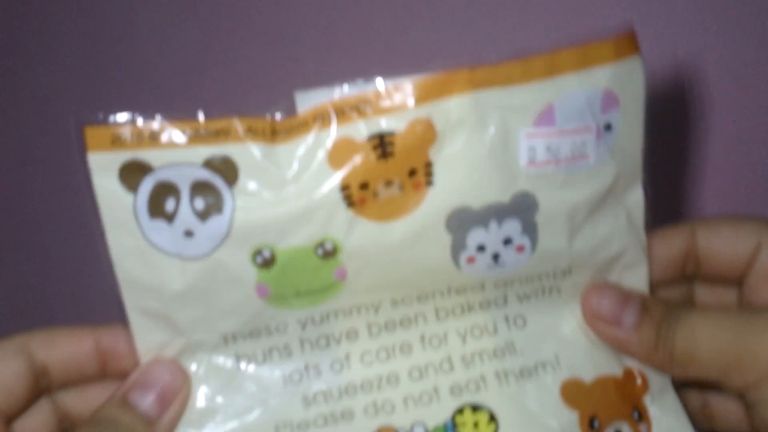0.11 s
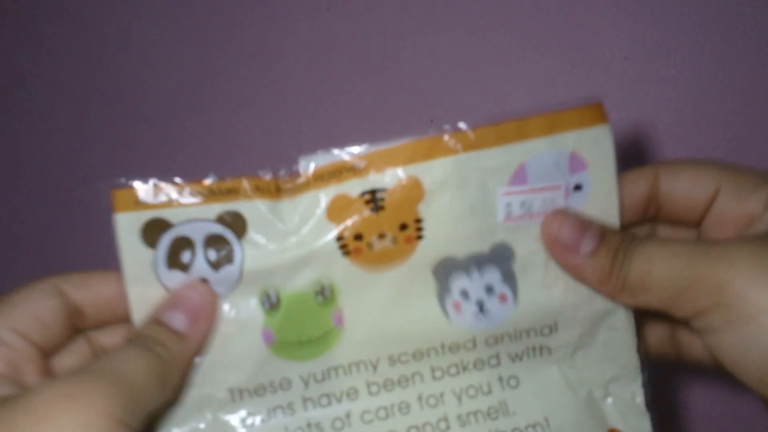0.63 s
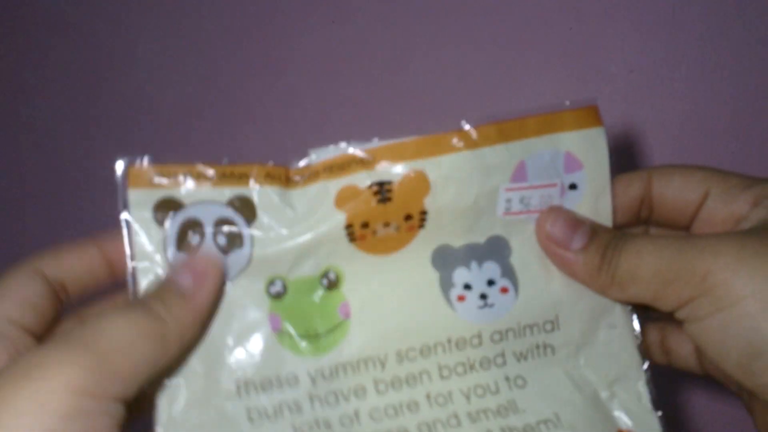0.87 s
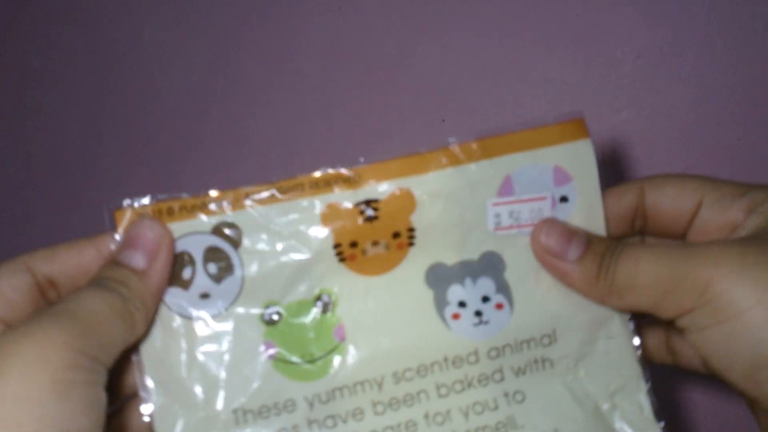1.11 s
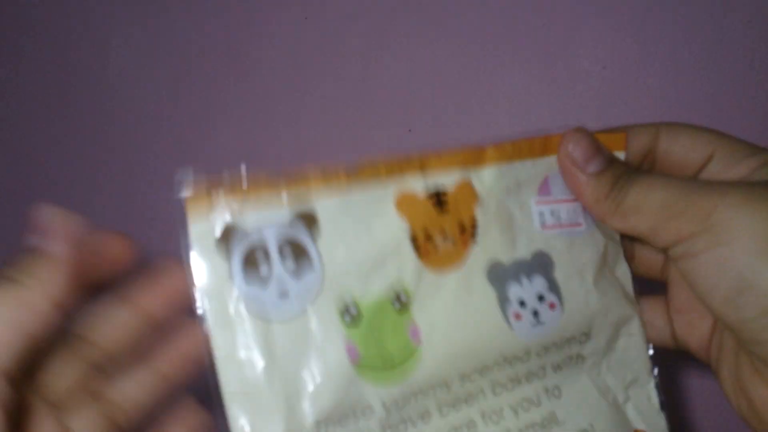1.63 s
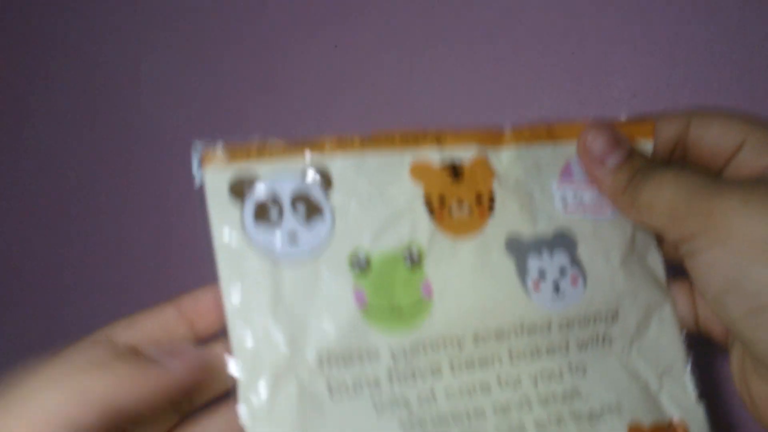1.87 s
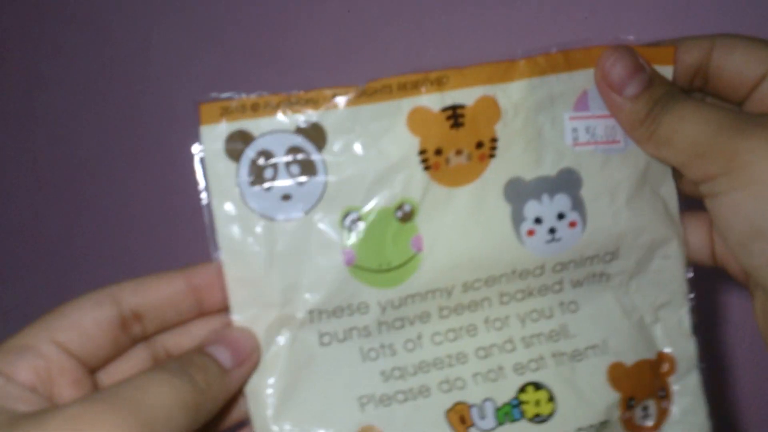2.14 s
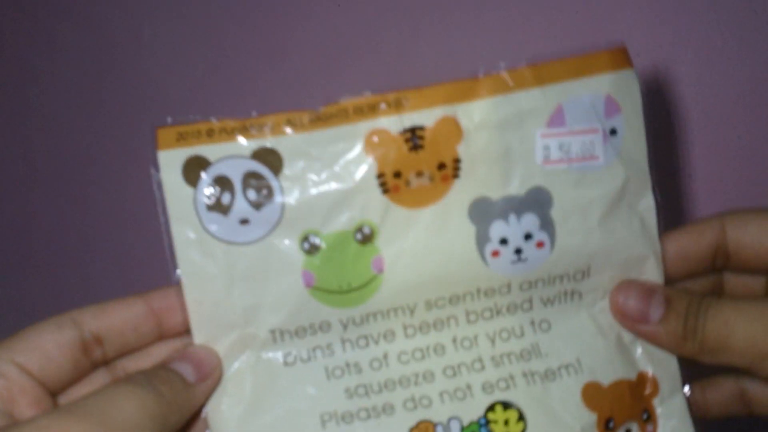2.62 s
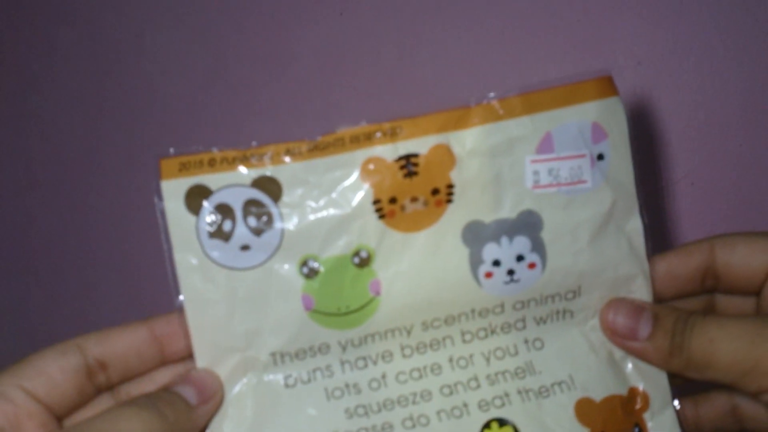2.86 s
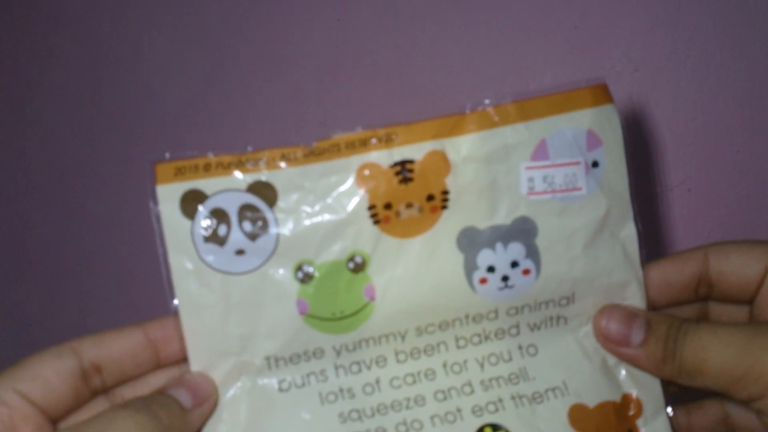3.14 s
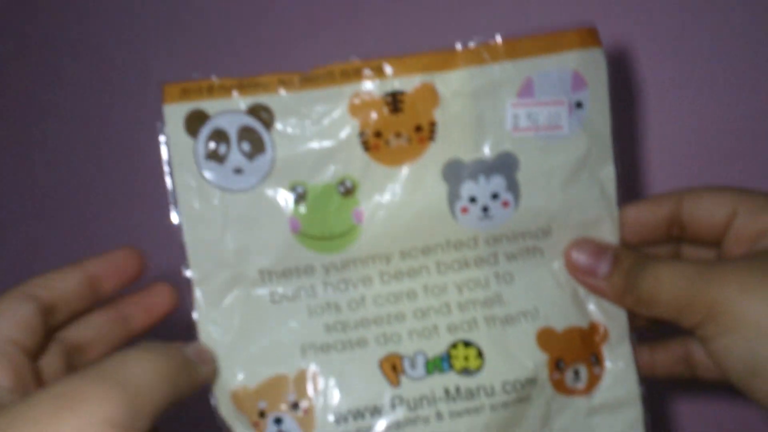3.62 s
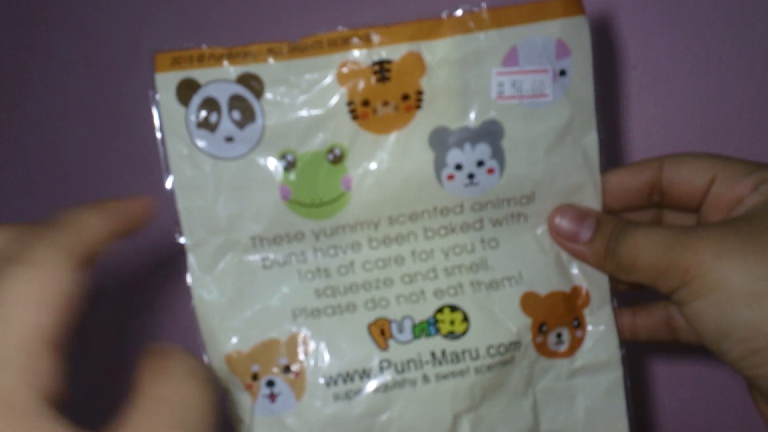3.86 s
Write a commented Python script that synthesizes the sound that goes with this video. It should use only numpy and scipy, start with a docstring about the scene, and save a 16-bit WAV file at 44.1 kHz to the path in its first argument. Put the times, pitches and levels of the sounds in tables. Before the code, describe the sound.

A thin plastic packet crackles close to stereo microphones in a quiet small room. The loudest, densest burst comes within the first 0.15 seconds; uneven crisp snaps and soft low air puffs continue, strong again around 0.55 and 0.75, thinning after 1.7. A lighter cluster returns at 2.2-2.45, then scattered ticks, faint ones near 3.35 and 3.55. Low motor hum, hiss and a barely audible airy band persist to 4 seconds.

```python
"""A thin plastic packet crackles and snaps close to a pair of microphones in a quiet room, squeezed by hands.
Creases buckle in bursts of clicks, each striking a bank of decaying resonances: the film and the air it holds.
Soft low pulses are the air the packet pumps; two noise tails give the reflections.
A motor hums low as wavering sines, over shaped noise for the room and the microphone hiss.
A faint airy band of noise, carried on a gliding tone, rises a little and then slides mostly down."""
import sys
import numpy as np
from scipy import signal
from scipy.fft import rfft, irfft
from scipy.io import wavfile

SR = 44100
rng = np.random.default_rng(int(sys.argv[2]) if len(sys.argv) > 2 else 0)


def int16_out(signal):
    """Quantize to a 16-bit WAV file."""
    q = np.round(np.clip(np.atleast_2d(signal).T, -1, 1) * 32767)
    wavfile.write(sys.argv[1], SR, q.astype(np.int16))


def to_linear_factor(level_db):
    """Convert decibel levels (scalar or array-like) to linear amplitude factors."""
    exponent = np.asarray(level_db, float) / 20
    return 10 ** exponent


N = 176400  # four seconds
T = np.arange(N) / SR


def rms_one(x):
    """Scale to rms 1."""
    return x / np.sqrt(np.mean(x ** 2) + 1e-20)


def at_hz(points, hz):
    """Read a (frequency, value) table on a log-frequency axis."""
    table_hz, values = np.transpose(points)
    return np.interp(np.log(hz), np.log(table_hz), values)


def drift(rate_hz):
    """Random wander of rms 1: white noise through two equal one-pole low-passes at rate_hz."""
    r = np.exp(-2 * np.pi * rate_hz / SR)
    noise = rng.standard_normal(N + SR)
    return rms_one(signal.lfilter([1], [1, -2 * r, r * r], noise)[SR:])  # drop the filter's settling


def crackle():
    """Fingers press the film: clicks at random moments, in clumps, follow the pressure."""
    # finger pressure, heard as crackle: (time [s], level [dB], treble tilt [dB])
    squeeze = [(0.0, -46.5, -4), (0.034, -49.5, 2), (0.041, -37.5, -1.5), (0.094, -32.5, -2),
               (0.095, -25.5, -4), (0.132, -27, -6.5), (.139, -33.5, -0.5), (0.188, -54, -1),
               (0.258, -59, -3.5), (.265, -46.5, -2), (0.37, -52.5, -3.5), (0.389, -67, 2), (.5, -78, -24),
               (0.542, -42, -4.5), (0.574, -45.5, -9), (.6, -61.5, 7), (.63, -67.5, 2), (0.708, -83, -9),
               (0.718, -40.5, -9), (0.762, -41, -1.5), (0.786, -36, -3), (0.808, -59.5, 8), (.86, -71, -3),
               (.94, -49, -7), (1.021, -53, 1), (1.04, -85, 16), (1.073, -75, 1), (1.082, -48, -5.5),
               (1.122, -41.5, 3.5), (1.132, -54, 3.5), (1.21, -57.5, 2.5), (1.25, -64, 8),
               (1.29, -55, -5.5), (1.332, -49.5, 0.5), (1.39, -76.5, -1), (1.45, -49.5, -13),
               (1.5, -63, -4.5), (1.522, -52, 1.5), (1.604, -73.5, 0), (1.62, -47, -3.5), (1.656, -67, 5),
               (1.689, -65, 0), (1.75, -70.5, -9)]
    hold_db, hold_treble_db, hold_until_s = -73, -6, 2.72  # faint crackle while the packet is only held
    clicks_per_s = 5000  # before clumping
    level_db, spread_db = -11, 1.5
    s, squeeze_db, squeeze_treble_db = np.transpose(squeeze)

    clumps_db = 2.8 * drift(90)
    born = rng.random(N) < clicks_per_s * to_linear_factor(clumps_db) / SR
    uneven_db = spread_db * np.minimum(rng.exponential(1, N), 3)
    sizes = rms_one(born * to_linear_factor(clumps_db + uneven_db))
    pressure_db = np.interp(T, s, squeeze_db, right=hold_db)
    sizes = sizes * to_linear_factor(pressure_db + level_db) * (T < hold_until_s)

    treble = np.interp(T, s, squeeze_treble_db, right=hold_treble_db) + 2 * drift(90)
    bass = np.full(N, -11.5)  # dB
    pitch = 1100 * 2 ** (0.49 * drift(47))  # Hz, wandering by octaves
    return sizes, treble, bass, pitch


def add_snaps(sizes, treble, bass, pitch):
    """A single crease buckles: twenty quick clicks rise, fade and grow duller, replacing crackle they land on."""
    # creases: (time [s], level [dB], treble tilt [dB], bass tilt [dB], pitch [Hz])
    snaps = [(0.003, -30.5, -5.5, -13, 990), (0.02, -39, -5, -13, 1000), (0.025, -26.5, -9, -12, 980),
             (0.036, -36, 6.5, -20, 3300), (0.049, -39, -14, -20, 1100), (0.062, -24.5, -8, -19, 1400.0),
             (0.07, -34, -5, -26, 990.0), (0.085, -32.5, 8, -6, 990.0), (0.097, -22, -19, -23, 1010),
             (0.102, -21, -17, -20, 1300), (0.122, -18, -19, -9, 1010.0), (0.126, -40, -7.0, -11, 940.0),
             (0.134, -12.5, -19, -16, 970), (0.167, -46, 4, -7, 1380.0), (0.202, -38, -11, -12, 1400.0),
             (0.22, -40.5, 0, -12, 1030.0), (0.235, -39, 2.5, -12, 1370.0), (0.261, -34, -21, -18, 1470),
             (0.268, -31.5, -2, -39, 1340), (0.281, -38, 3, -18, 1220.0), (0.294, -41, -12, -15, 1370.0),
             (0.309, -28.5, -4, -36, 1400), (0.331, -36.5, 1, -8, 835), (0.346, -31.5, -3, -20, 1530.0),
             (0.359, -34, -9, -8, 1640), (0.368, -37.5, -9, -4, 1200), (0.403, -45, 2, 6, 1470),
             (0.465, -45.5, -13, -10, 1030), (0.513, -39.5, -13.5, -12, 1400), (0.529, -40, -5, 8, 1430.0),
             (0.546, -28.5, -6, -6, 1170), (0.562, -27.5, -2.5, -12, 900), (0.568, -36.5, 0, -16, 1300),
             (0.591, -35, 3.5, -16, 1420), (0.61, -47, -7, -13, 760.0), (0.661, -44.5, -6.5, -24, 3750),
             (0.719, -36.5, -4, -10, 1000), (0.726, -30, -4.5, -16, 870.0), (0.738, -35, 3, -31, 1570.0),
             (0.758, -30, -2, -4, 1400), (0.762, -24, -0.5, -16, 1300), (0.781, -25.5, -12, -12, 1340),
             (0.803, -46, -5, -16, 930.0), (0.836, -50, -3, -17, 1440.0), (0.853, -38.5, -5, -18, 3470),
             (0.874, -29.5, -9, -32, 1400), (0.896, -41.5, 3.5, -21, 1320), (0.912, -40, -8.0, -16, 1400),
             (0.924, -45.5, 4, -20, 1590.0), (0.937, -37, -20, -19, 980.0), (0.949, -40, 8.5, 4, 1460.0),
             (0.962, -49, 10, -17, 4500), (0.975, -41.5, 3, 0, 1510.0), (0.982, -33, -2, -4, 820),
             (1.004, -34, -16, -20, 1490), (1.022, -47, 7, -2, 1400.0), (1.087, -37.5, -14, -10, 1260),
             (1.095, -41, 5, -10, 710.0), (1.103, -45, -8, -24, 1370), (1.112, -38.5, 8, 0, 4870),
             (1.121, -37, 7, -10, 1490), (1.139, -32.5, -8, -25, 1290), (1.152, -33, 0, -26, 1430),
             (1.173, -32.5, -14, -37, 1400.0), (1.179, -28.5, -1.5, -29, 1430),
             (1.192, -42, -7, -10, 1040.0), (1.205, -33.5, 6, -17, 1400), (1.21, -28.5, 5, -17, 1400.0),
             (1.223, -35, -20, -9, 1410.0), (1.231, -39, -3, -8, 1010.0), (1.243, -50, -27, -14, 1130.0),
             (1.271, -34, -12.5, -34, 1440), (1.293, -32.5, -7, -10, 614), (1.311, -35, -4, -10, 760),
             (1.332, -31.5, -0.5, -19, 810), (1.34, -43, -3, -17, 780.0), (1.364, -48.5, -3, 7, 940),
             (1.447, -39.5, -3.5, -21, 1480.0), (1.455, -37, -7.5, -16, 900), (1.474, -48, -6, -7.0, 1400),
             (1.487, -38.5, 0.5, -12, 1200), (1.516, -42, 8, -14, 1000), (1.52, -31.5, 3, -10, 1200),
             (1.529, -32, -20, -10, 1370), (1.538, -47, -17, 3, 920.0), (1.552, -48, 4, -2, 600),
             (1.565, -40.5, -33, -17, 1570.0), (1.577, -50, -12, -14, 750.0), (1.587, -50, -16, 5, 1065),
             (1.615, -43.5, 0.5, -15, 2480), (1.634, -39.5, 5.5, -4, 810.0), (1.652, -42, 6, 1, 850.0),
             (1.664, -39.5, -20, -22, 1500.0), (1.682, -55, -6.0, 7, 1470), (1.726, -51.5, -4, -3, 1390),
             (1.744, -50, 7.5, -1, 520.0), (1.83, -53, -18, 8, 920.0), (1.862, -41.5, -12, -21, 820),
             (1.924, -54, -17, 8, 1770), (2.091, -51.5, -5, 8.5, 930.0), (2.142, -40, -11.5, -5, 950.0),
             (2.18, -48, -16, -13, 1590), (2.195, -36, -15, -6, 990), (2.203, -38.5, -7.5, -24, 855),
             (2.215, -52, -13.0, -17, 1350.0), (2.271, -55.5, 5, -10, 980.0),
             (2.285, -35.5, -11, -22, 1060.0), (2.295, -50, -14, -11, 1650.0), (2.312, -48, -3, -13, 960.0),
             (2.339, -29.5, -6.5, -39, 1570), (2.363, -39, -7.5, -25, 1400), (2.375, -48, -5, 1, 1490),
             (2.386, -39.5, -10, -29, 1650.0), (2.412, -34, -4.5, -32, 1400.0),
             (2.421, -37, -4, -34, 1340.0), (2.429, -43, -5, -35, 1420), (2.452, -38, -10.5, -33, 1294),
             (2.532, -48, -4.5, -4.5, 1464), (2.654, -45.5, -16, -5, 1120), (2.661, -39, -10, -3, 700),
             (2.684, -49, -8, -14, 980.0), (2.691, -44, -2, -7, 1554), (2.727, -57, -3, -6, 990),
             (2.767, -37.5, -14, -6.5, 700), (3.338, -41.5, -28, -8, 1110), (3.35, -48, -8.5, -5, 1600),
             (3.366, -46.5, -22, -1, 970), (3.549, -51, -27, 1.5, 660)]
    snap_s = 0.0022  # time unit of a burst, which spans about two of them
    gain_db, fade_db, dulling_db = -3, 10, 1.5  # fade and treble loss are per snap_s
    rise = 0.2  # in units of snap_s
    s, level_db, treble_db, bass_db, hz = np.transpose(snaps)[:, :, None]

    late = np.linspace(0, 2, num=20) + rng.uniform(0, 0.1, (len(snaps), 20))  # in units of snap_s
    where = np.clip((s + snap_s * late) * SR, 0, N - 1).astype(int)
    sizes[where] = to_linear_factor(level_db + gain_db - fade_db * late) * np.minimum(late / rise + 0.11, 1)
    treble[where] = treble_db + dulling_db * (0.5 - late)
    bass[where] = bass_db
    pitch[where] = hz
    return sizes, treble, bass, pitch


def packet():
    """Every click strikes each patch of film, a decaying resonance, with a strength of its own per side."""
    # how loud the patches ring, ahead of the bass slope: (frequency [Hz], level [dB])
    film = [(40, -5.5), (100, -14.5), (200, -15), (340, -16), (500, -3), (750, -5), (1100, -8),
            (1600, -8.5), (2100, -7.5), (3000, -5.5), (5000, -3.5), (8000, -7), (12000, -8), (16000, -6)]
    # how much of a click both sides share: (frequency [Hz], share of power [0 to 1])
    click_alike = [(300, 0.95), (1200, 0.95), (1700, 1), (2500, 0.52), (8000, .15)]
    treble_from_hz, treble_full_hz = 1500, 4860
    bass_from_hz, bass_full_hz = 1405, 450
    pitch_lift_db, pitch_octaves = 10, 0.26  # a crease favours the patches near its pitch
    shift_db, shift_hz = 2.2, 40  # patches loosen and tighten as the film folds
    ring_cycles, ring_least_s = 3.8, 0.0035  # length of a 60 dB decay

    sizes, treble, bass, pitch = add_snaps(*crackle())
    hit = np.flatnonzero(sizes)
    out = np.zeros((2, N))
    for hz in np.r_[np.geomspace(40, 5000, num=26), np.linspace(5800, 16500, num=13)]:
        treble_share = np.log(hz / treble_from_hz) / np.log(treble_full_hz / treble_from_hz)
        bass_share = np.log(bass_from_hz / hz) / np.log(bass_from_hz / bass_full_hz)
        tilt_db = np.clip(treble_share, 0, 1.25) * treble[hit] + np.clip(bass_share, 0, 1) * bass[hit]
        octaves_off = np.log2(hz / pitch[hit])
        lift_db = pitch_lift_db * np.exp(-0.5 * (octaves_off / pitch_octaves) ** 2)
        lift_db = lift_db + shift_db * drift(shift_hz)[hit]

        # row 0 is common to both sides, rows 1 and 2 belong to left and right
        shape = (3, len(hit))
        chance = rng.uniform(0.6, 1.35, shape) * rng.choice([-1, 1], shape)
        alike = np.clip(at_hz(click_alike, hz), 0, 1)
        strength = np.sqrt(alike) * chance[0] + np.sqrt(1 - alike) * chance[1:]
        struck = np.full((2, N), 1e-18)
        struck[:, hit] = sizes[hit] * to_linear_factor(tilt_db + lift_db) * strength

        r = to_linear_factor(-60 / (max(ring_cycles / hz, ring_least_s) * SR))
        w = 2 * np.pi * hz / SR
        gain = to_linear_factor(at_hz(film, hz)) * min(hz / 1000, 1) * np.sin(w)
        out += signal.lfilter([0, gain], [1, -2 * r * np.cos(w), r * r], struck)
    return out


def puffs():
    """The packet pumps air at the microphones: soft low pulses, a few sine cycles under a half-sine swell."""
    # pulses ahead of the ports: (start time [s], level [dB], pitch [Hz])
    pulses = [(.095, -37, 46), (0.526, -41, 50), (.712, -38, 54), (0.772, -55, 68.6), (1.451, -50, 60),
              (1.82, -52, 50)]
    cycles = 2.5
    out = np.zeros(N)
    for s, level_db, hz in pulses:
        turn = np.clip((T - s) * hz, 0, cycles)
        out -= to_linear_factor(level_db) * np.sin(2 * np.pi * turn) * np.sin(np.pi * turn / cycles)
    return out


def reflections(x, level_db, t60_s, cut_hz):
    """A dense dying noise tail, shared in the bass, different on each side above."""
    apart_hz = 1500
    t = T[:SR // 2]
    noise = rng.standard_normal((3, len(t)))
    shared = signal.lfilter(*signal.butter(2, apart_hz, "low", fs=SR), noise[0])
    apart = signal.lfilter(*signal.butter(2, apart_hz, "high", fs=SR), noise[1:])
    tail = signal.lfilter([1], [1, -np.exp(-2 * np.pi * cut_hz / SR)], shared + apart)
    tail = tail * to_linear_factor(-60 * t / t60_s) * (t > 0.001)
    tail = tail / np.sqrt(np.sum(tail ** 2, axis=1, keepdims=True))
    return to_linear_factor(level_db) * signal.fftconvolve(x, tail, axes=1)[:, :N]


def resonance(x, hz, width_hz, gain_db):
    """A bump or dip in the response: a two-pole peaking filter."""
    w, a = 2 * np.pi * hz / SR, to_linear_factor(gain_db / 2)
    k = np.sin(w) * width_hz / hz / 2
    return signal.lfilter([1 + k * a, -2 * np.cos(w), 1 - k * a], [1 + k / a, -2 * np.cos(w), 1 - k / a], x)


def ports(x):
    """Each microphone port colours the sound; the left loses more bass, the right hears a little late."""
    # port resonances and dips: (frequency [Hz], width [Hz], gain [dB])
    left_port = [(930, 200, 7), (1400, 260, 10.5), (1650, 200, 4), (2090, 530, -4), (3550, 1500, 8.5),
                 (7400, 1800, 4), (10780, 1300, -6.5), (15200, 1500, 5)]
    right_port = [(930, 350, 5), (1400, 300, 1), (2010, 300, -6), (2480, 400, 2.5), (4300, 1000, 2),
                  (8900, 6600, -0.5), (12800, 3800, 7.5)]
    left_gain_db, right_lag_s = -2.5, 0.0001
    left_bass_cut_hz, right_bass_cut_hz = 60, 20
    left = x[0] * to_linear_factor(left_gain_db)
    right = np.interp(T - right_lag_s, T, x[1])
    for row in left_port:
        left = resonance(left, *row)
    for row in right_port:
        right = resonance(right, *row)
    left = signal.lfilter(*signal.butter(1, left_bass_cut_hz, "high", fs=SR), left)
    right = signal.lfilter(*signal.butter(1, right_bass_cut_hz, "high", fs=SR), right)
    return np.array([left, right])


def motor_hum():
    """A motor's steady low sines waver a little in level, weaker and ahead in phase on the left."""
    # tones on the right side, before the waver: (frequency [Hz], rms level [dB], phase [rad])
    tones = [(48.68, -51, 4.8), (148, -80, .3), (303, -82.5, .7)]
    lead_rad = np.array([[0.9], [0]])
    side_db = np.array([[-5.5], [0]])
    out = np.zeros((2, N))
    for hz, level_db, phase in tones:
        out += to_linear_factor(level_db) * np.sqrt(2) * np.sin(2 * np.pi * hz * T + phase + lead_rad)
    return out * to_linear_factor(side_db + 0.5 * drift(1.4))


def room_and_hiss():
    """Steady shaped noise, its likeness between the sides and its balance set by frequency."""
    # spectrum shape, rescaled as a whole below: (frequency [Hz], relative level [dB per Hz])
    spectrum = [(20, 0.5), (35, -2), (70, 2), (110, -5), (170, -11.5), (300, -10.5), (500, -10), (900, -16),
                (1300, -19), (2200, -22.5), (3400, -23.5), (4300, -22.5), (5500, -26), (7000, -27),
                (10500, -28), (13500, -25.5), (14700, -25.5), (15400, -22.5), (16000, -18.5)]
    # stereo balance: (frequency [Hz], left minus right [dB])
    balance = [(60, -8), (380, -4), (1300, -1.5), (2400, -2.5), (4400, 2.5), (8100, -2.5), (13000, 3),
               (15400, 18)]
    # likeness of the sides, limited to -1..1: (frequency [Hz], correlation [-1 to 1])
    likeness = [(60, 0.76), (130, -1.1), (290, 0.71), (640, 0.43), (1410, 0.02), (3100, 0.04),
                (6820, -0.33), (15000, -0.0)]
    level_db = -59.5  # rms over both sides
    hz = np.maximum(np.fft.rfftfreq(N, 1 / SR), 1)
    mid, side = rfft(rng.standard_normal((2, N)))
    alike = np.clip(at_hz(likeness, hz), -1, 1)
    lean_db = at_hz(balance, hz) / 2
    both = np.sqrt(1 + alike) * mid + np.sqrt(1 - alike) * side * [[1], [-1]]
    both = both * to_linear_factor([lean_db, -lean_db]) * to_linear_factor(at_hz(spectrum, hz))
    return to_linear_factor(level_db) * rms_one(irfft(both, N))


def airy_band():
    """Narrow noise carried on a gliding centre, unrelated left and right."""
    # centre of the band: (time [s], frequency [Hz])
    glide = [(0, 5200), (1.9, 5590), (2.5, 4900), (3.0, 4300), (3.3, 3875), (3.53, 4180), (4, 3680)]
    level_db, spread_hz = -84, 300
    turn = 2 * np.pi * np.cumsum(np.interp(T, *np.transpose(glide))) / SR
    sides = [drift(spread_hz) * np.sin(turn) + drift(spread_hz) * np.cos(turn) for _ in range(2)]
    return to_linear_factor(level_db) * np.array(sides)


def scene():
    """Packet, reflections and puffs through the ports, over hum, noise and the airy band."""
    film = packet()
    near = reflections(film, level_db=-12.5, t60_s=0.033, cut_hz=14000)
    room = reflections(film, level_db=-20, t60_s=0.33, cut_hz=3000)
    return ports(film + near + room + puffs()) + motor_hum() + room_and_hiss() + airy_band()


def band_limit(x):
    """A steep low-pass at the top of the band."""
    return signal.sosfilt(signal.butter(12, 16970, fs=SR, output="sos"), x)


def record(dry):
    """Cut the top steeply, 45 dB down from 16060 Hz up, and finish the mix."""
    top_cut = signal.cheby2(16, 45, 16060, fs=SR, output="sos")
    mix = signal.sosfilt(top_cut, dry)
    return band_limit(mix)


dry = scene()
out = record(dry)
int16_out(out)
```